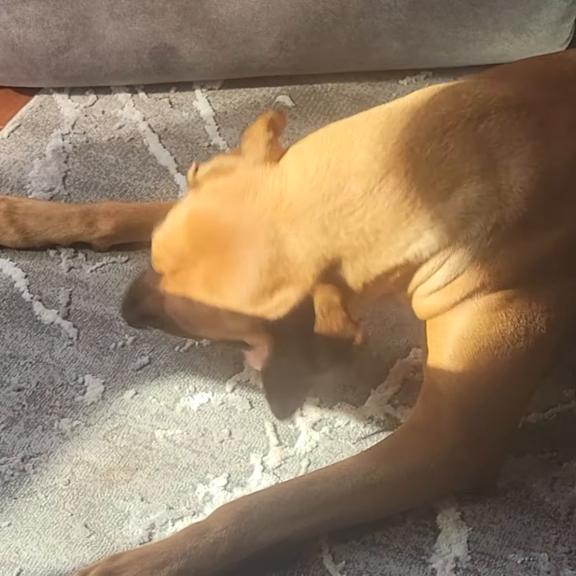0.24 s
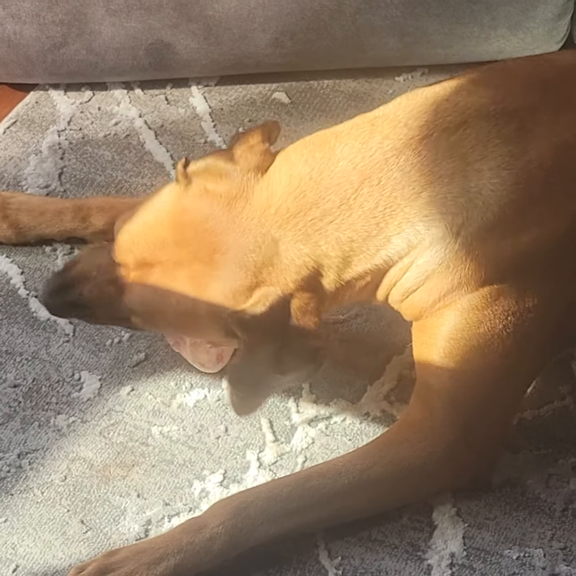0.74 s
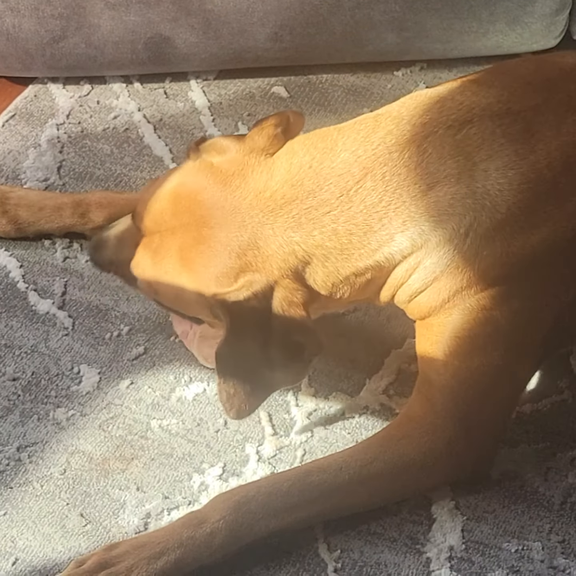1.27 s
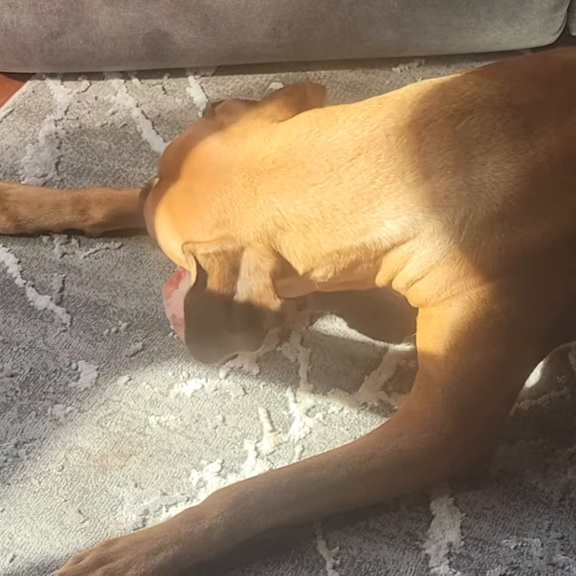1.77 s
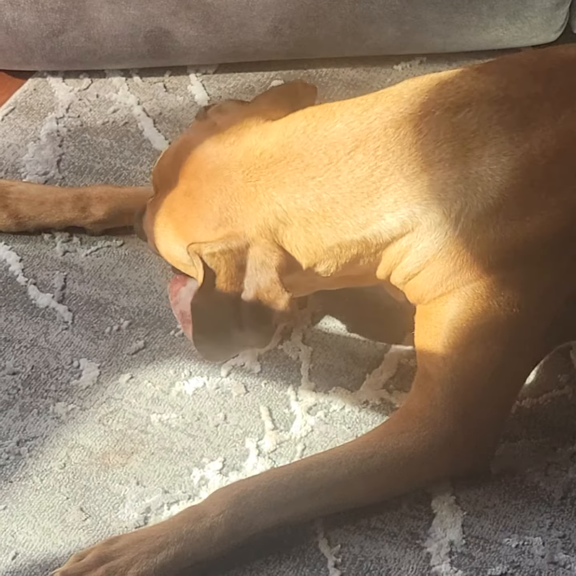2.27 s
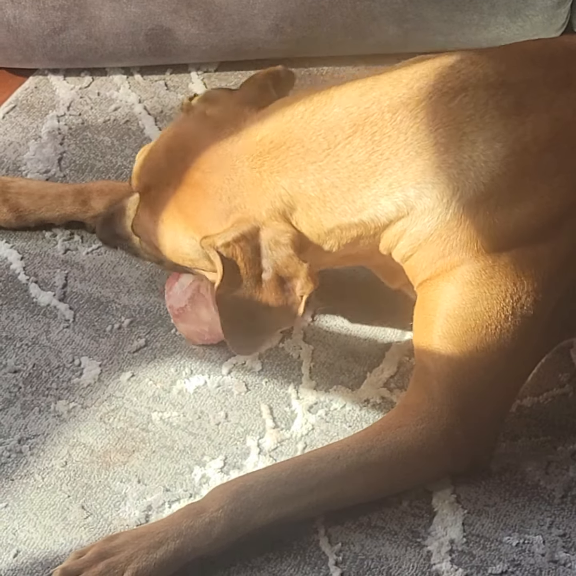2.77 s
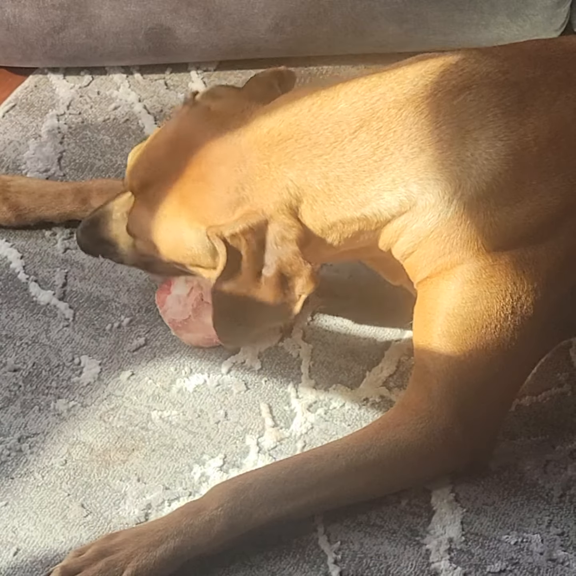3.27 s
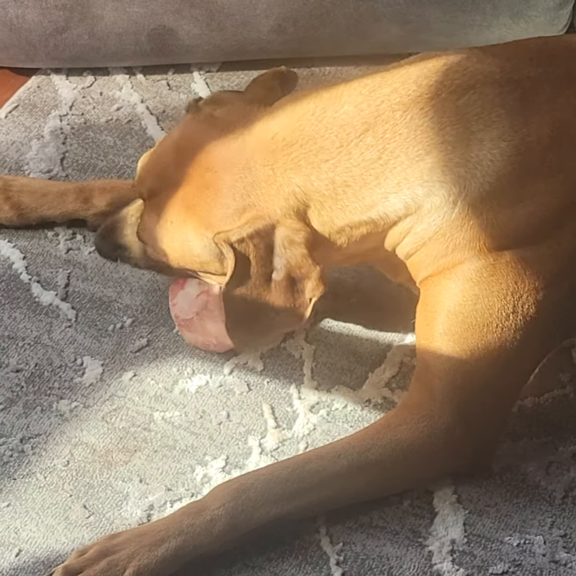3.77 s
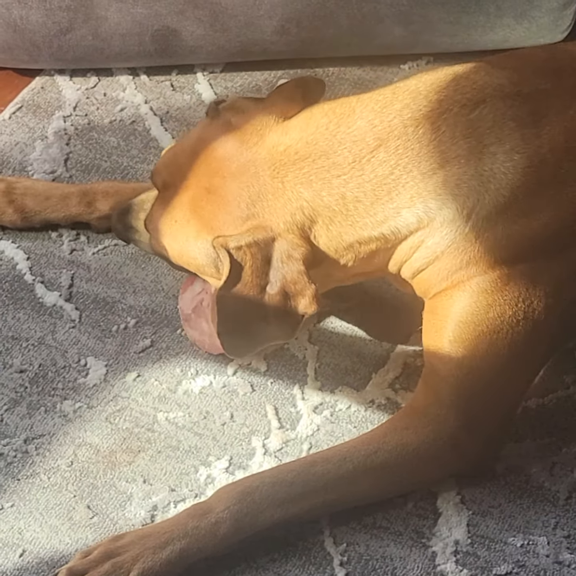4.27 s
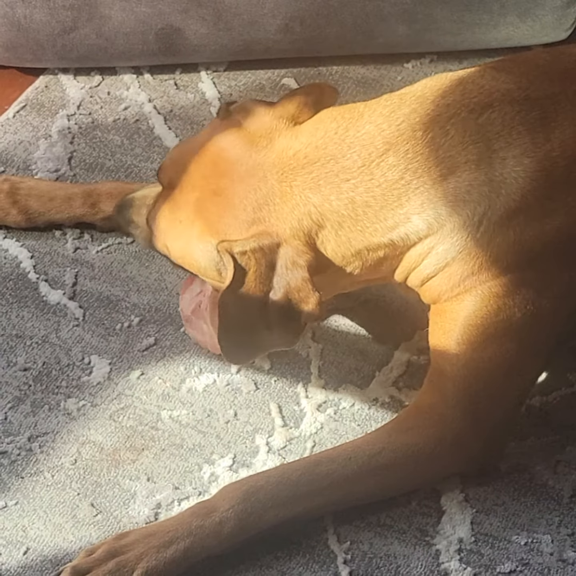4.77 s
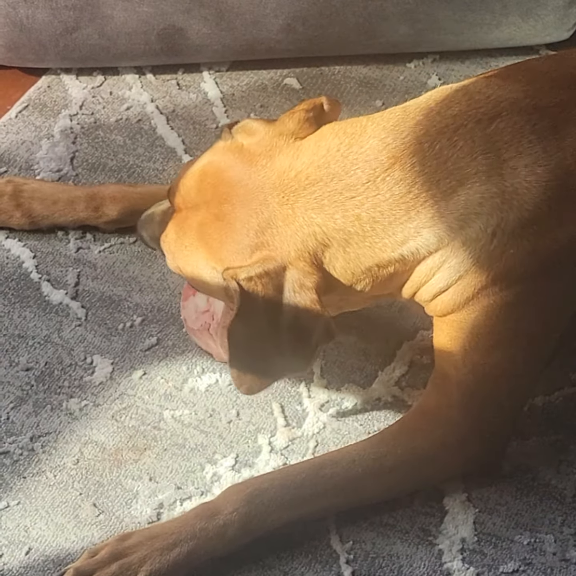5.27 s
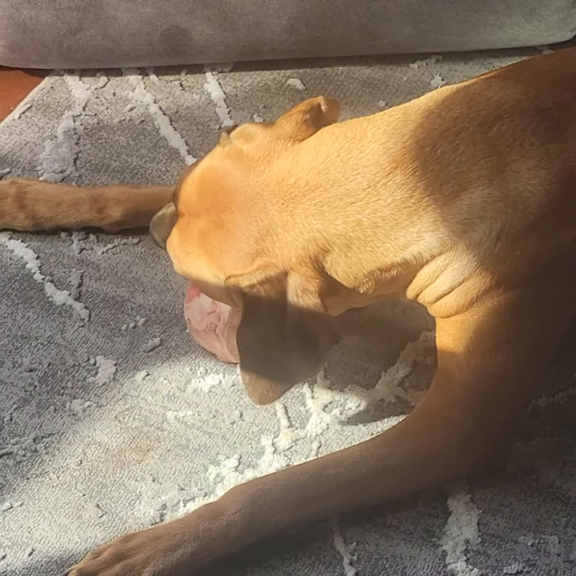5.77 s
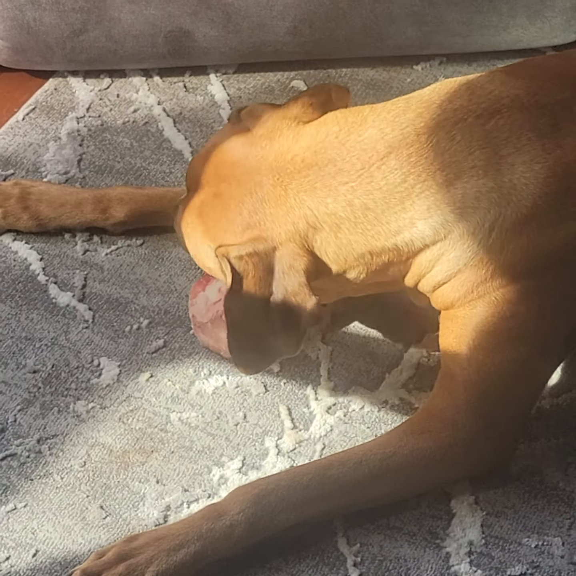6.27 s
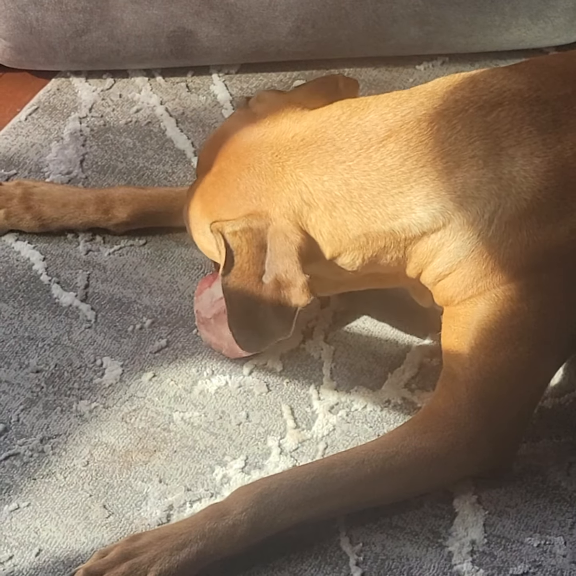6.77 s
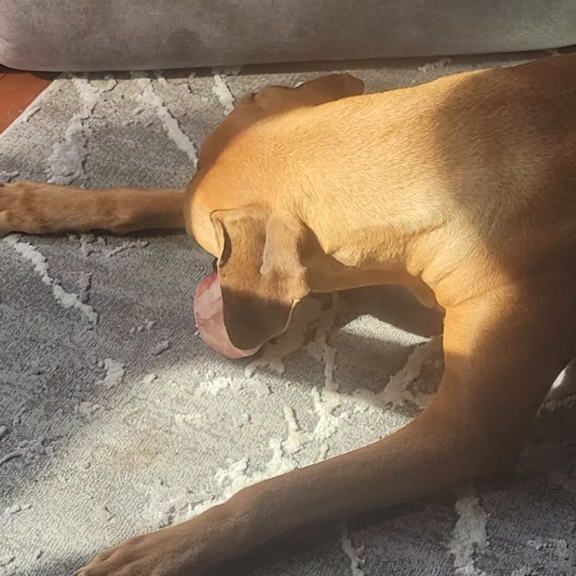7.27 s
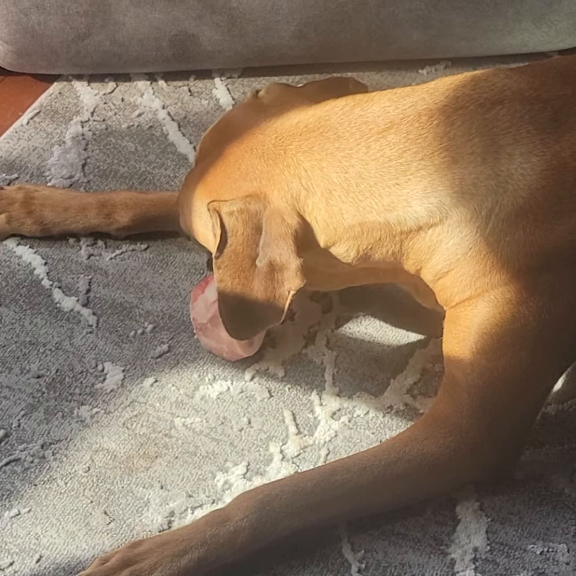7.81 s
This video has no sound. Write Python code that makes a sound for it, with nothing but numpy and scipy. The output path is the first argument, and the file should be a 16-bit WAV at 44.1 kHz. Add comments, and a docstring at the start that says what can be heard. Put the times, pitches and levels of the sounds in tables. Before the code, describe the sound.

A dog gnaws a bone on a rug, with hollow tooth knocks, dull scrapes and wet lip smacks, ending on a bright saliva pop.

```python
"""A dog lies on a rug in a small living room and works at a bone between its paws for eight seconds.
From the start its teeth knock resonances out of the bone and floor, and chews scrape it over the rug in random grains;
saliva crackles in tiny snaps as the lips smack. From 0.6 s decaying sine rings make bubbles burst between bites.
Noise in a narrow band makes a thin hiss from about 1.8 to 3.5 s. Bites then grow sparser, up to a bright pop at 7.76 s.
Damped low sines sway the floor; decaying noise makes the room ring, over a faint steady hum of shaped noise."""
import sys
import numpy as np
from scipy import signal
from scipy.fft import rfft, irfft, next_fast_len
from scipy.io import wavfile

SR = 44100
rng = np.random.default_rng(int(sys.argv[2]) if len(sys.argv) > 2 else 0)


def wrap_up_sound(samples):
    """Save the sound to the file named by the first command line argument, as 16-bit audio."""
    columns = np.atleast_2d(samples).T
    # keep every value between -1 and 1, then stretch to whole-number steps
    tamed = np.clip(columns, -1, 1)
    steps = np.round(tamed * 32767).astype(np.int16)
    wavfile.write(sys.argv[1], SR, steps)


N = 354563
AGE = np.arange(SR // 2) / SR   # seconds since an event began

# resonances of the bone: f/Hz, width/Hz, relative level/dB
BONE_MODES = [(498, 44, -12), (573, 57, -2.5), (689.5, 64, 4.5), (924, 200, -19.5), (1140, 130, -18.5),
              (1240, 540, -17.5)]
# resonances of the floor: f/Hz, width/Hz, relative level/dB
FLOOR_MODES = [(57.4, 8, -9.5), (91.4, 19, -0.5), (162.3, 51, 3), (222.7, 31.5, 3), (312.4, 33, -2.5)]
# resonances between the teeth: f/Hz, width/Hz, relative level/dB
TEETH_MODES = [(2592, 140, 9), (3100, 440, -3), (4080, 1300, -5), (5040, 1800, -6.5), (6880, 290, -5.5)]


def from_db(db):
    """Decibels to gain."""
    return 10 ** (np.asarray(db) / 20)


def unit(x):
    """Scale to an energy of one."""
    return x / np.sqrt(np.sum(x ** 2, axis=-1, keepdims=True) + 1e-30)


def at_hz(points, hz, axis=1):
    """Read a column of a table on a log-frequency axis."""
    table = np.array(points)
    return np.interp(np.log(np.maximum(hz, 1)), np.log(table[:, 0]), table[:, axis])


def add(track, s, sound):
    """Mix a sound in from time s."""
    start = max(round(s * SR), 0)
    track[start:start + len(sound)] += sound[:N - start]


def low_pass(x, hz, order=2):
    """Butterworth low-pass."""
    sections = signal.butter(order, min(hz, SR / 2 - 1), fs=SR, output="sos")
    return signal.sosfilt(sections, x + 1e-18)


def resonate(x, modes):
    """Parallel resonances with deep valleys between them."""
    out = 0
    for hz, width, db in modes:
        r = np.exp(-np.pi * width / SR)   # a wider resonance dies sooner
        poles = [1, -2 * r * np.cos(2 * np.pi * hz / SR), r * r]
        zeros = np.array([1, 0, -1]) * (1 - r * r) / 2
        out = out + from_db(db) * signal.lfilter(zeros, poles, x + 1e-18)
    return out


def varied(modes, detune=0.024, uneven_db=2):
    """No two bites grip alike: each one shifts the resonances and excites them differently."""
    chance = np.clip(rng.standard_normal((len(modes), 2)), -2, 2)
    return [(hz * (1 + detune * shift), width, db + uneven_db * lift)
            for (hz, width, db), (shift, lift) in zip(modes, chance)]


def grains(count, per_s, spread_db):
    """Random tiny clicks of uneven size and sign."""
    born = rng.random(count) < per_s / SR
    sizes = from_db(spread_db * np.clip(rng.standard_normal(count), -2, 2))
    return born * rng.choice([-1, 1], count) * sizes


def stroke(swell, fade, wait=0):
    """Force that builds up softly after a wait and then lets go."""
    age = AGE - wait
    build_up = np.sin(np.pi / 2 * np.clip(age / swell, 0, 1)) ** 2
    return build_up * np.exp(-np.maximum(age - swell, 0) / fade)


def at_level(sound, force, db):
    """Match the energy of a sound to that of its force, then offset it by db."""
    return from_db(db) * unit(sound) * np.sqrt(np.sum(force ** 2))


def knocks(chatter_s=0.0061, chatter_share=0.65, thud_hz=450, lasts_s=0.014, enamel_db=-34, enamel_top_hz=7000):
    """A tooth clicks and skids; the bone rings as gripped, muffled by the lips, and passes the blow to the floor."""
    # teeth knock on the bone: t/s, knock level/dB, floor thud level/dB, nominal bone f/Hz, muffled above f/Hz
    blows = [(.001, -39, -58, 720, 1170), (.052, -50, -65, 746, 950), (.096, -47.5, -53, 690, 870),
             (.131, -44.5, -52.5, 740, 885), (.18, -46, -62, 712, 1300), (.952, -39, -51, 565, 1640),
             (1.147, -60, -47, 650, 1190), (1.472, -52, -73, 837, 1200), (1.737, -35.5, -61, 705, 1100),
             (1.749, -41.5, -67, 746, 1020), (1.859, -38, -46.5, 747, 1500), (1.895, -43, -32.5, 613, 920),
             (2.264, -32.5, -57, 830, 1990), (2.288, -26, -49, 706, 1280), (2.315, -34.5, -62, 717, 940),
             (2.384, -29.5, -42, 673, 1160), (2.402, -31, -54, 588, 940), (2.431, -39.5, -39, 640, 935),
             (2.901, -34, -46.5, 705, 1100), (2.995, -44.5, -45, 722, 1000), (3.433, -39.5, -63, 760, 1180),
             (3.448, -36.5, -49, 520, 1720), (3.455, -41, -39, 777, 1300), (3.501, -42, -50, 470, 1300),
             (3.521, -40, -38.5, 396, 905), (3.6, -45, -45, 563, 1490), (3.611, -42.5, -44.5, 360, 1060),
             (4.045, -75, -51.5, 650, 705), (4.522, -62, -64, 446, 1200), (4.574, -59.5, -61, 700, 990),
             (5.083, -37.5, -58, 691, 1220), (5.585, -39, -35, 690, 1110), (5.774, -46, -51, 690, 1400),
             (5.804, -46.5, -38.5, 663, 810), (6.765, -37, -77, 676, 1380), (7.757, -35.5, -72, 604, 1300)]
    thud_lag_s = 0.00601   # the bone gives way before it meets the floor
    out = np.zeros(N)
    main_hz = max(BONE_MODES, key=lambda mode: mode[2])[0]
    for s, knock_db, thud_db, pitch_hz, muffle_hz in blows:
        skid = grains(len(AGE), 1200, 5.0) * np.exp(-AGE / chatter_s)
        contact = chatter_share * unit(skid)
        contact[0] += 1   # the landing itself
        gripped = [(hz * pitch_hz / main_hz, width, db) for hz, width, db in varied(BONE_MODES, detune=0.017)]
        ring = low_pass(resonate(contact, gripped), muffle_hz, order=5)
        click = low_pass(contact, enamel_top_hz, order=6)
        thud = low_pass(resonate(contact, FLOOR_MODES), thud_hz, order=3)
        add(out, s, from_db(knock_db) * unit(ring))
        add(out, s, from_db(knock_db + enamel_db) * unit(click))
        add(out, s + thud_lag_s, from_db(thud_db) * unit(thud))
    return out * np.sqrt(lasts_s * SR)   # levels are reckoned over this length


def chews(drag_hz=400, scrape_hz=1200):
    """The bone sticks and slips, dull on the rug and coarser under the teeth; the same push squeezes out saliva."""
    # the jaw bears down: t/s, swell/s, rug drag level/dB, tooth scrape level/dB, wet crackle level/dB
    bites = [(0, 0.083, -45, -48, -72.5), (.162, 0.019, -51.5, -59, -49), (0.271, 0.018, -69, -58, -76),
             (.95, 0.1, -59, -60.5, -71.5), (1.089, 0.043, -57, -60, -63), (1.21, 0.042, -54.5, -65, -69),
             (1.821, 0.062, -53.5, -55, -52), (1.89, 0.027, -49, -61, -83), (2.3, 0.0087, -48, -50, -69),
             (2.385, 0.052, -56.5, -38.5, -63), (2.905, 0.1, -50, -53.5, -59.5),
             (3.43, 0.062, -41.5, -45.5, -60.5), (3.93, 0.046, -54.5, -58, -76),
             (4.52, 0.11, -56.5, -71, -82), (5.12, 0.091, -44.5, -52.5, -65.5),
             (5.569, 0.073, -49.5, -64, -95), (5.7, 0.049, -40.5, -51.5, -63.5),
             (6.122, 0.054, -45.5, -65, -73.5)]
    bone_release_s, saliva_release_s = 0.041, 0.017   # the bone settles more slowly than the saliva
    out = np.zeros(N)
    for s, swell, drag_db, scrape_db, wet_db in bites:
        force = stroke(swell, bone_release_s)
        rug_slips = force * grains(len(AGE), 1600, 2.1)
        drag = low_pass(resonate(rug_slips, FLOOR_MODES), drag_hz, order=3)
        tooth_jerks = force * grains(len(AGE), 350, 3.2)
        scrape = low_pass(resonate(tooth_jerks, varied(BONE_MODES, detune=0.03)), scrape_hz, order=3)
        wet = saliva(stroke(swell, saliva_release_s), wet_db)
        add(out, s, at_level(drag, force, drag_db) + at_level(scrape, force, scrape_db) + wet)
    return out


def smacks():
    """The lips peel apart, snap free and open a small pocket of air."""
    # lips and tongue part: t/s, fade/s, wet crackle level/dB, thinness/dB (more spray, less hollow),
    # wet gap f/Hz, air pocket level/dB, air pocket f/Hz
    partings = [(.167, 0.0049, -44, 5.5, 3200, -54, 1330), (.182, 0.014, -47, 9.5, 3250, -60, 1280),
                (0.951, 0.01, -53, -1.5, 2970, -42, 1337), (1.143, 0.0082, -54.5, 0.5, 2750, -49, 1430),
                (1.208, 0.007, -53.5, 7, 2740, -45.5, 1380), (1.243, .012, -58, 5, 2700, -70, 1410),
                (1.736, 0.0017, -56, -4, 2710, -51, 1190), (1.875, 0.023, -47.5, 2, 2260, -61, 1340),
                (2.261, 0.0019, -50, -4, 2030, -44, 1230), (2.275, 0.0035, -44.5, 13, 7440, -54, 1340),
                (2.313, 0.0036, -53, 4, 3280, -59, 1300), (2.381, 0.017, -48.5, -3.5, 3480, -59, 1290),
                (2.43, 0.0068, -51.5, 5.5, 3550, -65, 1300), (2.601, 0.03, -72.5, 17, 6950, -56, 1300),
                (2.899, 0.002, -70, -2, 2620, -41, 1195), (3.447, 0.0034, -60, -7, 2940, -43, 1430),
                (3.499, 0.022, -53, 0.5, 3350, -43, 1870), (3.808, 0.0058, -71, 19, 4030, -77, 1350),
                (4.312, 0.022, -66.5, 6.5, 4500, -77, 1370), (4.578, 0.015, -65, 2, 2800, -68, 1420),
                (5.194, 0.014, -62, -2, 2650, -62, 1460), (5.765, 0.017, -50.5, -2, 2700, -57, 1470),
                (6.293, 0.0098, -49.5, 3.5, 2890, -67, 1350), (6.762, 0.019, -48, -2.5, 3030, -34.5, 1377),
                (7.27, 0.014, -53.5, -3, 2900, -41, 1140), (7.353, 0.0017, -51, 7.5, 3530, -52, 1770),
                (7.749, 0.005, -47, -4, 3100, -37, 1370), (7.7555, 0.005, -41, 3.5, 2650, -38.5, 1413)]
    peel_s, peel_db, snap_s = .02, -16, 0.001853   # a soft peel swells before the quick snap
    out = np.zeros(N)
    for s, fade, db, thin_db, gap_hz, pocket_db, pocket_hz in partings:
        peel = from_db(peel_db) * stroke(peel_s, fade)
        force = peel + stroke(snap_s, fade, wait=peel_s)
        add(out, s - peel_s, saliva(force, db, thin_db, gap_hz, snaps_per_s=1300))
        add(out, s + snap_s, bubble(pocket_db, pocket_hz, cycles=8.7))
    return out


def saliva(force, db, thin_db=0, gap_hz=2830, snaps_per_s=750, spread_db=5.5,
           teeth_top_hz=7900, mouth_top_hz=1850, count=5):
    """A film tears in many snaps that ring between the teeth, in the mouth and in a wet gap of changing size."""
    # hollow of the mouth: f/Hz, width/Hz, relative level/dB
    mouth_modes = [(520, 130, -10), (659, 146, -1.5), (1133, 220, -6.5), (1290, 82, -1.5)]
    # fine spray: f/Hz, width/Hz, relative level/dB
    spray_modes = [(9200, 1100, -20), (12700, 4000, 7), (15100, 2200, -10.5)]
    hollow_db, spray_db = 5, -17.5   # against the crackle
    gap_width_hz, gap_share = 100, 0.78
    gap_spread_octaves, gap_edge_db = .35, 16.5   # the gap wanders this far, and is weaker at the extremes
    snaps = force * grains(len(AGE), snaps_per_s, spread_db)
    dealt = rng.integers(0, count, len(AGE))   # each snap meets one of the gap sizes
    sizes = varied([(gap_hz * 2 ** (gap_spread_octaves * k), gap_width_hz, -gap_edge_db * abs(k))
                    for k in np.linspace(-1, 1, count)])
    gap = sum(resonate(snaps * (dealt == k), [mode]) for k, mode in enumerate(sizes))
    bright = unit(resonate(snaps, varied(TEETH_MODES))) + gap_share * unit(gap)
    crackle = low_pass(bright, teeth_top_hz, order=12)
    hollow = low_pass(resonate(snaps, varied(mouth_modes, detune=0.037)), mouth_top_hz, order=4)
    spray = resonate(snaps, spray_modes)
    out = at_level(crackle, force, db)
    out = out + at_level(hollow, force, db + hollow_db - thin_db)
    return out + at_level(spray, force, db + spray_db + thin_db)


def bubble(db, hz, cycles, overtone=2.08, overtone_db=-13):
    """A bubble rings for a few cycles, with a weaker ring above."""
    turns = hz * AGE[:SR // 25]
    ring = np.sin(2 * np.pi * turns) + from_db(overtone_db) * np.sin(2 * np.pi * overtone * turns)
    return from_db(db) * ring * (1 - np.exp(-2 * turns)) * np.exp(-turns / cycles)


def pops(top_hz=7900, cycles=2.28, count=4):
    """A bubble bursts on the lips and sets off weaker neighbours of other sizes, mostly smaller."""
    # clusters of saliva bubbles burst: t/s, level/dB, f/Hz of the first bubble
    bursts = [(.626, -43.5, 3720), (.702, -40.5, 7700), (1.403, -47.5, 1280), (3.501, -38.5, 3390),
              (4.199, -52.5, 3100), (4.23, -52, 3730), (4.259, -50.5, 2830), (4.297, -51, 4450),
              (4.333, -49.5, 2860), (4.7425, -39.5, 3010), (4.791, -45.5, 3000), (5.386, -56, 3130),
              (5.777, -43, 2690), (6.279, -45.5, 4930), (6.483, -40.5, 6770), (6.869, -55.5, 6800),
              (7.041, -45, 4500), (7.113, -55, 3240), (7.273, -40.5, 2900), (7.3544, -44, 3560),
              (7.515, -57, 3400), (7.532, -45, 2720), (7.7553, -26, 2780), (7.957, -47, 6700),
              (7.998, -39, 4180)]
    mean_delay_s, neighbour_db, spread_octaves = .007, -7.5, 0.4   # the level is the most a neighbour can have
    out = np.zeros(N)
    for s, db, hz in bursts:
        add(out, s, bubble(db, hz, cycles))
        for delay, size, weight in rng.random((count, 3)):
            neighbour_hz = hz * 2 ** (spread_octaves * (3 * size - 1))   # leans upward
            neighbour_s = s - mean_delay_s * np.log(1 - delay)
            add(out, neighbour_s, weight * bubble(db + neighbour_db, neighbour_hz, cycles))
    return low_pass(out, top_hz, order=6)


def moist_ticks(level_db=-91, per_s=70):
    """The wet mouth ticks faintly all the while, in clicks that ring between the teeth."""
    ticks = low_pass(resonate(grains(N, per_s, 1.4), TEETH_MODES), 7800, order=8)
    return from_db(level_db) * np.sqrt(N) * unit(ticks)


def bumps(swell_cycles=0.89, fade_s=0.054):
    """The dog's weight shifts and the floor sways for a few cycles; the deeper the sway, the softer its start."""
    # the dog shifts its weight: t/s, level/dB, sway f/Hz
    shifts = [(.02, -55, 59.4), (0.258, -48.5, 31), (0.313, -52.5, 60.5), (0.962, -52.5, 90),
              (1.24, -51, 77.2), (1.86, -54, 47), (2.442, -50, 51.5), (2.907, -46, 83.8),
              (2.985, -48, 87.7), (4.57, -50, 110.4), (5.59, -49, 80)]
    out = np.zeros(N)
    for s, db, hz in shifts:
        force = stroke(swell_cycles / hz, fade_s)
        add(out, s, from_db(db) * force * np.sin(2 * np.pi * hz * AGE))
    return out


def room_response(early_s=0.012, build_s=0.0017):
    """Close reflections off paws and furniture, then a tail where each band dies at its own rate."""
    # room: f/Hz, t60/s, early level/dB, late level/dB, weight of the part that differs between the ports
    room_bands = [(79.5, 0.31, -3, 2.5, 0.15), (245, 0.31, -5, -11, 0.53), (475, 0.36, -4, -4.5, 0.76),
                  (620, 0.28, 4.5, 0, 0.58), (2200, 0.28, -2.5, -9.5, 1.93), (6960, 0.24, -7, -12, 5.3),
                  (14000, 0.24, -7, -11, 0.8)]
    common, *own = rfft(rng.standard_normal((3, len(AGE))))
    hz = np.arange(len(common)) * SR / len(AGE)
    edges = [0, *np.geomspace(125, SR / 2, 16)]
    build_up, early_fade = 1 - np.exp(-AGE / build_s), np.exp(-AGE / early_s)
    out = 0
    for low, high in zip(edges, edges[1:]):
        t60, early_db, late_db, apart = (at_hz(room_bands, (low + high) / 2, axis=k) for k in range(1, 5))
        in_band = (hz >= low) & (hz < high)
        noise = irfft((common + apart * np.array(own)) * in_band, len(AGE))
        decay = np.exp(-np.log(1000) * AGE / t60)
        early = from_db(early_db) * unit(noise * build_up * early_fade)
        late = from_db(late_db) * unit(noise[:, ::-1] * (1 - early_fade) * decay)
        out = out + (early + late) * np.sqrt(2 * (high - low) / SR)   # weight by bandwidth
    return out


def reflections(x, count=10):
    """The head keeps shifting, so every 0.8 s one pattern of reflections fades into the next."""
    out = np.zeros((2, N))
    edges = np.linspace(0, N, count + 1).astype(int)
    overlap = SR // 25
    for start, end in zip(edges, edges[1:]):
        at = np.arange(max(start - overlap, 0), end)
        share = np.clip(np.minimum(at - start + overlap, end - at) / overlap, 0, 1)
        faded = x[at] * np.sin(np.pi / 2 * share)   # equal-power crossfade
        for track, response in zip(out, room_response()):
            add(track, at[0] / SR, signal.fftconvolve(faded, response))
    return out


def ports(x):
    """Two microphone ports: the left leads in phase, the right is louder save in the upper mids."""
    # phase by which the left leads: f/Hz, phase/rad
    lead = [(0, 0), (290, 0.38), (450, 2), (700, 2.5), (1000, 3.5), (1500, 2), (2200, 5.5), (3700, 7),
            (7000, 11.5), (16000, 36)]
    # left minus right: f/Hz, level/dB
    balance = [(60, -2.5), (170, -2), (370, -6), (700, -3.5), (1700, 2), (5000, -2.5), (14000, -2.5)]
    size = next_fast_len(N + SR // 10)
    hz = np.arange(size // 2 + 1) * SR / size
    side = np.array([[.5], [-.5]])   # half of each difference goes to either port
    turn = np.exp(1j * side * np.interp(hz, *np.transpose(lead)))
    return irfft(rfft(x, size) * turn * from_db(side * at_hz(balance, hz)), size)[:, :N]


def hiss():
    """A thin, faint hiss of band-limited noise swells twice and fades away."""
    # course of the hiss: t/s, level/dB
    course = [(1.7, -115), (1.98, -98), (2.55, -81.5), (2.8, -90.5), (3.33, -82), (3.6, -115)]
    level = from_db(np.interp(np.arange(N) / SR, *np.transpose(course)))
    band = [(4550, 890, 0)]   # f/Hz, width/Hz, level/dB
    noise = rng.standard_normal((2, N))
    narrow = resonate(resonate(noise, band), band)   # twice, for steeper sides
    return level * np.sqrt(N) * unit(narrow)


def hum(level_db=-64.5):
    """Steady air noise of the house, alike at both ports in the bass."""
    # spectrum of the air: f/Hz, relative level per Hz/dB
    spectrum = [(25, -17.5), (62, -9), (120, -14.5), (190, -8), (320, -3), (490, -14), (740, -13),
                (1000, -22.5), (1400, -26.5), (2050, -24), (3200, -35.5), (7600, -43), (8800, -57),
                (13000, -44)]
    # left-right likeness: f/Hz, correlation (0 to 1)
    likeness = [(60, .9), (250, 0.68), (600, 0), (15000, 0)]
    # left minus right: f/Hz, level/dB
    balance = [(60, -0.5), (180, -1.5), (550, -6.5), (1650, 7.5), (5000, 5.5), (15000, -3)]
    mid, side = rfft(rng.standard_normal((2, N)))
    hz = np.arange(len(mid)) * SR / N
    alike = np.clip(at_hz(likeness, hz), -1, 1)
    both = np.sqrt(1 + alike) * mid + np.sqrt(1 - alike) * side * [[1], [-1]]
    colour_db = at_hz(spectrum, hz) + at_hz(balance, hz) * [[.5], [-.5]]
    air = irfft(both * from_db(colour_db), N)
    return from_db(level_db) * air / np.std(air)


def scene():
    """Bone and lips lie under the muzzle, heard largely by reflection; bubbles are heard more directly."""
    # standing waves of the room: f/Hz, width/Hz, relative level/dB
    standing_waves = [(52, 8.3, -8), (90, 13, -1), (153.3, 11.2, 4.5), (196, 9.2, 6), (224.5, 10, 1),
                      (250.2, 7.2, -3), (337.5, 31, -1.5), (497, 46, -4), (585, 24, -14.5), (732, 18, 3),
                      (760, 5.9, 5)]
    blows = knocks()
    chewing = chews() + smacks()
    bubbles = pops() + moist_ticks()
    direct = from_db(-8) * blows + from_db(-8.0) * chewing + from_db(-3.0) * bubbles
    boom = from_db(-2.5) * resonate(blows + chewing, standing_waves)   # room modes ring on after each blow
    room = reflections(from_db(-3.0) * blows + from_db(-4.0) * chewing + bubbles)
    return ports(direct + room + boom + bumps()) + hum() + hiss()


def record(dry, cutoff_hz=15750):
    """An elliptic low-pass cuts the top steeply."""
    return signal.sosfilt(signal.ellip(10, .2, 70, cutoff_hz, fs=SR, output="sos"), dry)


dry = scene()
out = record(dry)
wrap_up_sound(out)
```